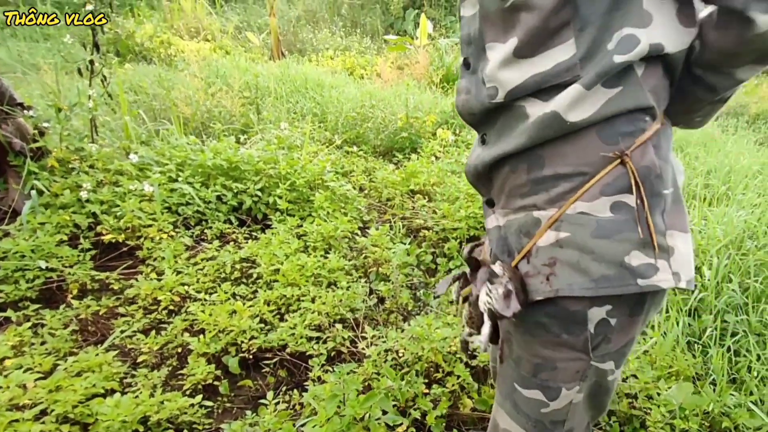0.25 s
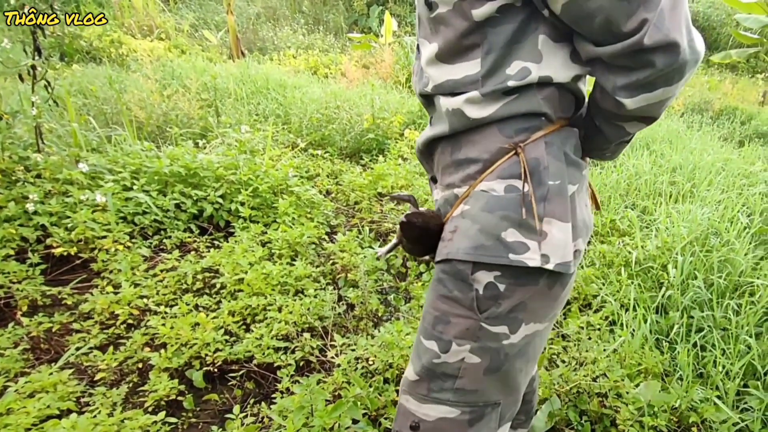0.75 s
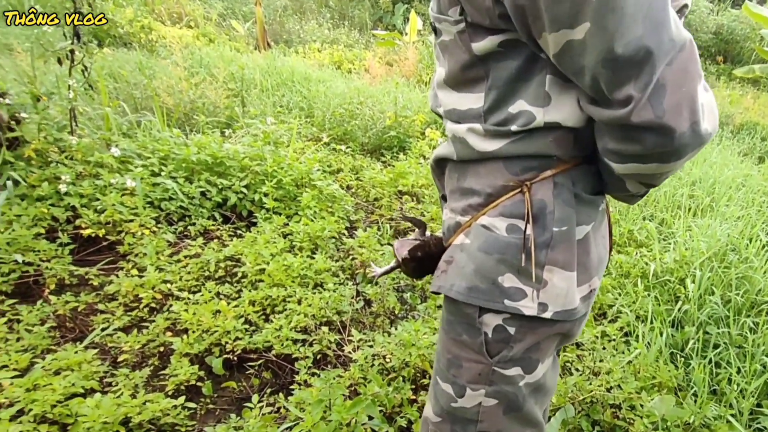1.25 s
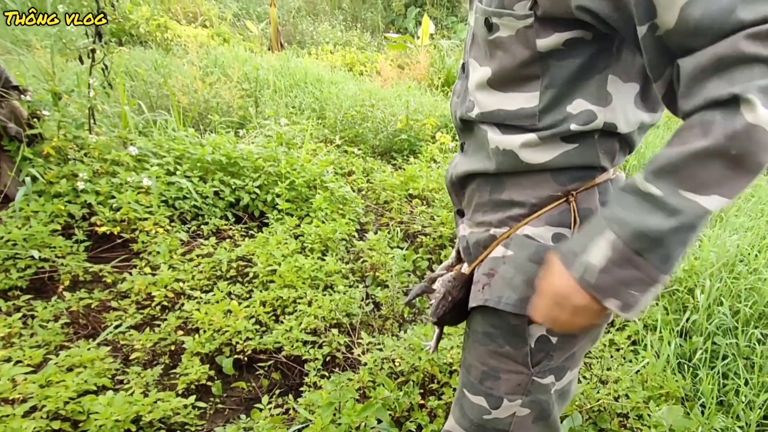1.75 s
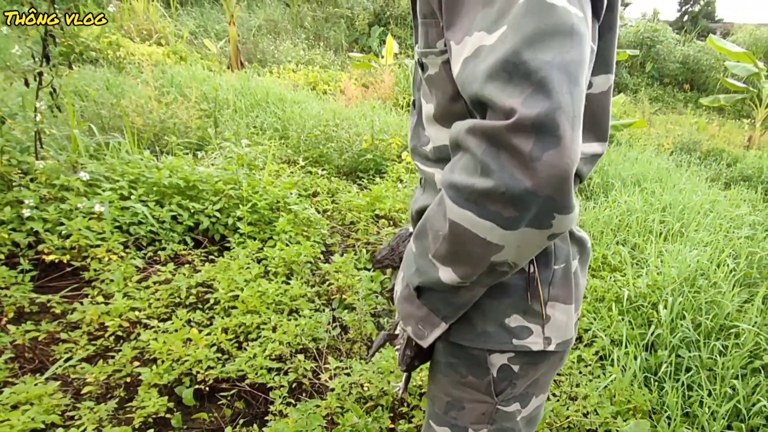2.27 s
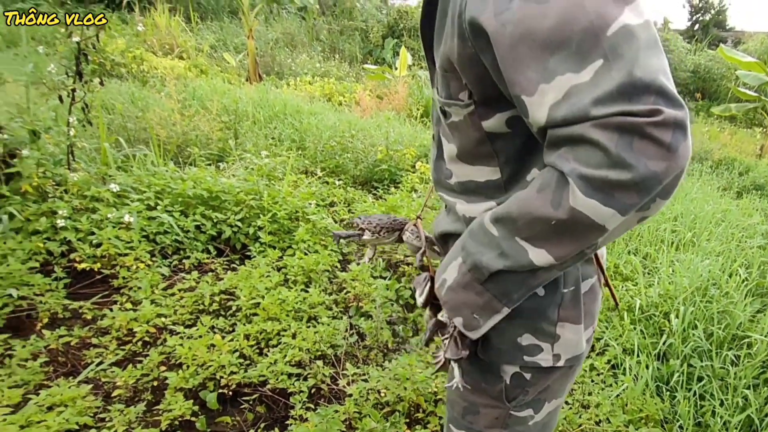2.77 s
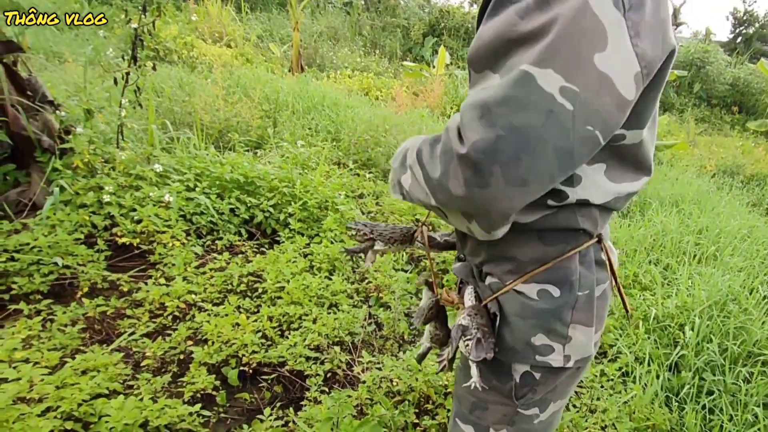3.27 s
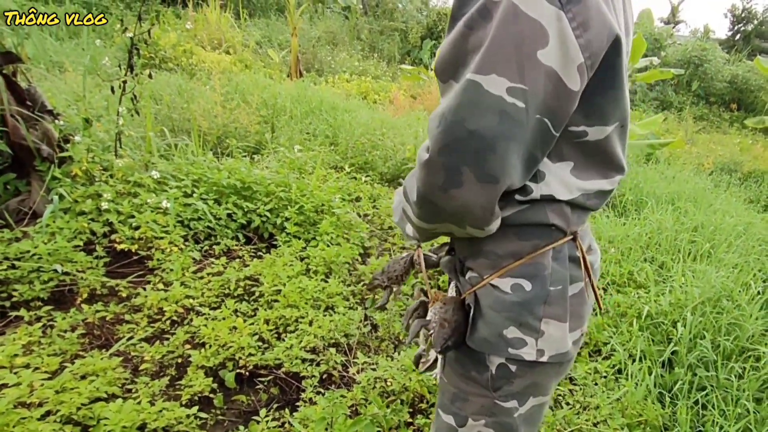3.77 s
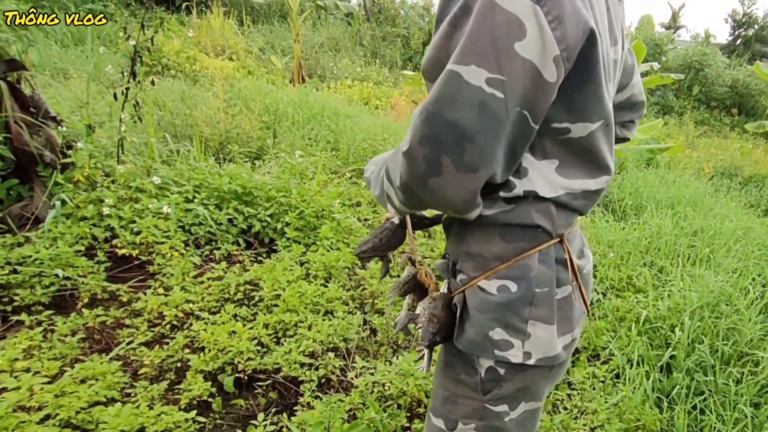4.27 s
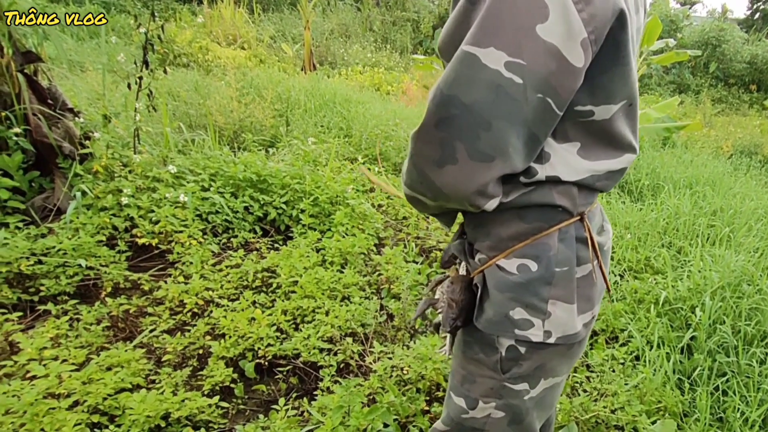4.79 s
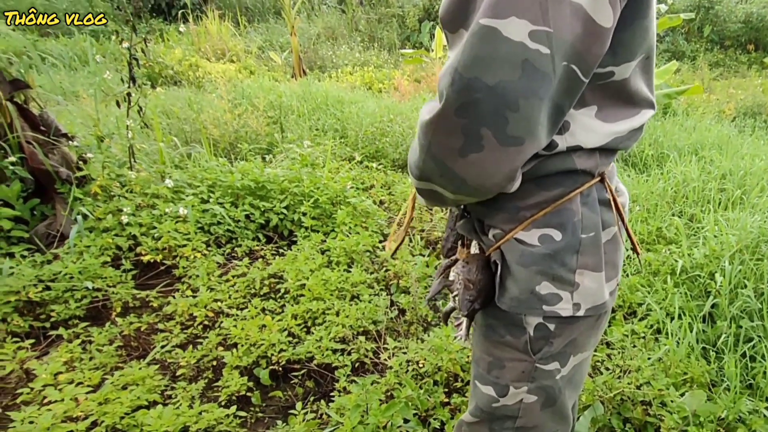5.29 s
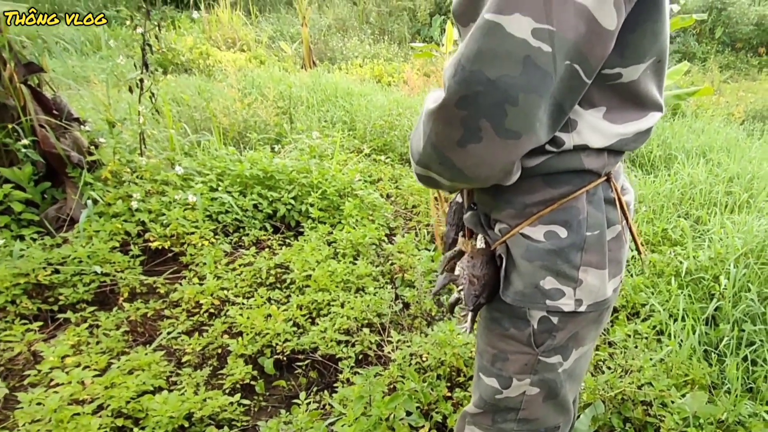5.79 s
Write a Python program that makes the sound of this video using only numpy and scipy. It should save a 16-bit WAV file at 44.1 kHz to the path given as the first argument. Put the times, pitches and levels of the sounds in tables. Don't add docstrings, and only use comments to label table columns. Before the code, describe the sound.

Three loud, buzzy, wailing frog distress cries outdoors, each ending in a small gulp, among cloth rustle, tiny ticks, faint hum and a far bark.

```python
import sys
import numpy as np
from scipy import signal
from scipy.fft import rfft, irfft
from scipy.io import wavfile
from scipy.ndimage import uniform_filter1d, map_coordinates

SR = 44100
rng = np.random.default_rng(int(sys.argv[2]) if len(sys.argv) > 2 else 0)


def int16_out(signal):
    q = np.round(np.clip(np.atleast_2d(signal).T, -1, 1) * 32767)
    wavfile.write(sys.argv[1], SR, q.astype(np.int16))


def volts(x):
    e = np.asarray(x, float) / 20
    return 10 ** e


N = 266364
FFT_SIZE = 1024


def along(points, hz):
    f, v = np.transpose(points)
    return np.interp(np.log(hz + 1), np.log(f + 1), v)


def curves(rows, t):
    s, *cols = np.transpose(rows)
    return [np.interp(t, s, c) for c in cols]


def unit(x):
    return x / np.sqrt(np.mean(np.abs(x) ** 2, axis=-1, keepdims=True) + 1e-20)


def wobble(rate_hz):
    knots = rng.standard_normal(int(N * rate_hz / SR) + 4)
    return map_coordinates(knots, [np.arange(N) * rate_hz / SR])


def outdoors(x, t60_s, dull_hz):
    t = np.arange(SR // 2) / SR
    tail = rng.standard_normal((2, len(t))) * volts(-60 * t / t60_s) * np.clip(t / 0.0022, 0, 1)
    tail = signal.lfilter(*signal.butter(1, dull_hz, fs=SR), tail)
    return signal.fftconvolve(np.atleast_2d(x), tail / np.linalg.norm(tail[0]), axes=1)[:, :N]


# freq_hz, correlation
LIKENESS = [(60, 0.86), (150, 0.9), (380, 0.73), (950, -0.125), (2380, -0.039), (5980, 0.024),
            (15000, -0.13)]


def rush(spectrum, patchy_db):
    _, _, z = signal.stft(rng.standard_normal((2, N + FFT_SIZE)), SR, nperseg=FFT_SIZE)
    patches = uniform_filter1d(uniform_filter1d(rng.standard_normal(z.shape[1:]), 8, 0), 5, 1)
    z = z * volts(patchy_db * patches / patches.std())
    pair = signal.istft(z, SR, nperseg=FFT_SIZE)[1][:, :N]
    f = np.fft.rfftfreq(N, 1 / SR)
    turn = np.arccos(np.clip(along(LIKENESS, f), -1, 1)) / 2
    mid, side = irfft(rfft(pair) * volts(along(spectrum, f)) * [np.cos(turn), np.sin(turn)], N)
    return unit(np.array([mid + side, mid - side]))


# start_s, end_s, pitch_rise_s, pitch_collapse_s, duck_db
SCREAM_TIMES = [
    (0.044, 0.574, 0.022, 0.052, 12),
    (1.112, 1.555, .031, 0.061, 7),
    (2.802, 3.483, .02, .075, 9.5),
]


def ducking(t):
    quick_share, quick_s, slow_s = 0.29, 0.1, 0.71
    dips = []
    for start, end, _, _, depth_db in SCREAM_TIMES:
        after = np.maximum(t - end, 0)
        down = 1 - np.exp(-np.maximum(t - start - 0.03, 0) / 0.08)
        back = quick_share * np.exp(-after / quick_s) + (1 - quick_share) * np.exp(-after / slow_s)
        dips.append(depth_db * down * back)
    return np.max(dips, axis=0)


# freq_hz, level_db
ENGINE_SPECTRUM = [(13, -40), (22, -13), (59, -5.5), (102, -10), (175, 2.5), (193, -2), (241, -9),
                   (422, -10.5), (480, -12), (619, -11), (715, -17.5), (800, -12.5), (1000, -21),
                   (1300, -66), (2200, -120)]


def engine(duck_db):
    level_db = -49 - 1.15 * duck_db + 0.556 * wobble(27)
    return volts(level_db) * rush(ENGINE_SPECTRUM, patchy_db=2.0)


# freq_hz, level_db
LEAF_SPECTRUM = [(410, -37.5), (700, -7.5), (784, 1.5), (878, -11), (1060, 1), (1520, -5), (1900, -2.5),
                 (4070, -4.5), (4850, -8.5), (7030, -12.5), (8200, -32.5), (10700, -62.5), (18000, -120)]


def leaves(duck_db, brush_db):
    level_db = -52.5 - duck_db + 0.58 * brush_db + 0.56 * wobble(9)
    return volts(level_db) * rush(LEAF_SPECTRUM, patchy_db=2.06)


# freq_hz, level_db
CLOTH_SPECTRUM = [(3820, -26), (6500, -5.5), (8460, -13.5), (11000, -13), (14000, -17.5), (16000, -19.5)]


def cloth(duck_db, brush_db):
    grains = volts(2.5 * wobble(280) + 1.2 * wobble(30))
    level_db = -70 - 0.64 * duck_db + 0.57 * brush_db
    return volts(level_db) * unit(grains * rush(CLOTH_SPECTRUM, patchy_db=-0.5))


# time_s, length_s, swell_db
CLOTH_BRUSHES = [
    (.01, 0.055, 3.5),
    (0.931, 0.18, 15),
    (2.1, 0.097, 2),
    (2.775, 0.31, 6),
    (5.102, 0.31, 2),
]


def field():
    t = np.arange(N) / SR
    duck_db = ducking(t)
    brush_db = sum(db * np.exp(-((t - s) / length) ** 2) for s, length, db in CLOTH_BRUSHES)
    return engine(duck_db) + leaves(duck_db, brush_db) + cloth(duck_db, brush_db)


def ticks(rows, turns, hiss):
    out, t = np.zeros((2, N)), np.arange(SR // 50) / SR
    for s, db, hz, pan_db in rows:
        wave = np.sin(2 * np.pi * hz * t) + hiss * rng.standard_normal(len(t))
        wave *= np.exp(-t * hz / turns) * (1 - np.exp(-t * hz * 3))
        pan = volts([[pan_db / 2], [-pan_db / 2]])
        out[:, round(s * SR):][:, :len(t)] += volts(db + 6.5) * wave * pan
    return out


# time_s, peak_db, pitch_hz, left_right_db
DULL_TICKS = [
    (0.033, -34, 853, 0),
    (1.093, -34, 756, 3.5),
    (2.792, -24.5, 1080, 2),
    (4.435, -33, 1440, 5),
]
# time_s, peak_db, pitch_hz, left_right_db
BRIGHT_TICKS = [(0.6614, -57.5, 3780, -12), (0.7154, -61, 2720, -5), (0.9991, -42.5, 3800, -9),
                (1.057, -42, 5150, -3.5), (1.0919, -41, 5800, 10), (1.9155, -54, 3860, 4),
                (2.0428, -42, 3860, 0), (2.0944, -48, 4020, 8), (2.173, -58, 2650, 0.0),
                (2.384, -44, 4100, 7.5), (2.4508, -43.5, 3670, -2), (2.6683, -37, 3970, 5),
                (4.5431, -37.5, 3636, 3.5), (4.6374, -47, 3630, 5), (5.1262, -51, 2660, -8),
                (5.253, -42.5, 4450, -5), (5.4194, -55, 3140, -3)]


def contacts():
    return ticks(DULL_TICKS, turns=1.27, hiss=0.021) + ticks(BRIGHT_TICKS, turns=1.74, hiss=.08)


# start_s, level_db, pitch_hz, length_s
DOG_BARKS = [
    (3.058, -44.5, 562, 0.053),
    (4.843, -29.5, 570.3, 0.0653),
]
# multiple, level_db
DOG_PARTIALS = [(1, -10), (2, 0), (3, -17), (4, -32)]
# delay_s, level_db
TREE_ECHOES = [(0.041, -15), (0.071, -6), (.105, -20), (0.151, -19)]


def dog():
    out = np.zeros(N + SR)
    for s, db, hz, length in DOG_BARKS:
        u = np.linspace(0, 1, round(length * SR))
        for delay, echo_db in [(0.002, 0.0066)] + TREE_ECHOES:
            pitch_hz = hz * (1 - 0.147 * (1 - u) ** 2) * (1 + 0.0326 * rng.standard_normal())
            turn = 2 * np.pi * np.cumsum(pitch_hz) / SR
            turn += .35 * map_coordinates(rng.standard_normal(16), [u * length * 160])
            hoarse = volts(4.1 * map_coordinates(rng.standard_normal(16), [u * length * 130]))
            tone = sum(volts(p + rng.normal(0, 0.73)) * np.sin(k * turn) for k, p in DOG_PARTIALS)
            bark = volts(db + echo_db) * tone * hoarse * np.sin(np.pi * u ** 1.96)
            out[round((s + delay) * SR):][:len(u)] += bark
    out = out[:N]
    direct = np.array([volts(0.5) * out, volts(-3.0) * np.roll(out, 10)])
    return direct + volts(-13.5) * outdoors(out, t60_s=0.33, dull_hz=3000)


# start_s, length_s, level_db, pitch_hz, sag_hz_per_s
FROG_GULPS = [
    (0.675, 0.081, -45.5, 489, 1986),
    (1.566, 0.03, -44.5, 443, 30.2),
    (1.666, 0.075, -43.5, 453, 1500),
    (3.485, 0.064, -52.5, 470, 100),
    (3.605, 0.075, -51, 548, 1620),
]


def gulps():
    out = np.zeros(N)
    attack_s, release_s = 0.004, 0.031
    for s, length, db, hz, sag in FROG_GULPS:
        t = np.arange(round(length * SR)) / SR
        turn = 2 * np.pi * np.cumsum(hz - sag * t) / SR
        shape = np.clip(np.minimum(t / attack_s, (length - t) / release_s), 0, 1) ** 2
        second = volts(-26 + 30.5 * t / length)
        tone = np.sin(turn) + second * np.sin(2 * turn)
        out[round(s * SR):][:len(t)] += np.sqrt(2) * volts(db) * shape * tone
    return out


def throat_pulses(call, pitch):
    start, end, rise, collapse, _ = call
    t = np.arange(round(start * SR), round(end * SR)) / SR
    glide_hz = uniform_filter1d(curves(pitch, t)[0], size=400, mode="nearest")
    glide_hz = glide_hz * (1 - .59 * np.exp(-((t - start) / rise) ** 2))
    glide_hz = glide_hz * (1 - 0.65 * np.exp(-((end - t) / collapse) ** 2))
    cycles = np.cumsum(glide_hz) / SR
    s = np.interp(np.arange(int(cycles[-1]) + 1), cycles, t)
    rate_hz = np.interp(s, t, glide_hz)
    luck = rng.standard_normal((len(s), 3))
    slack = (480 / rate_hz) ** 2.5
    s = s + .0007 * slack * luck[:, 0] / rate_hz
    return s, rate_hz, luck, slack


def bell(f, hz, width):
    return f * width / np.hypot(hz * hz - f * f, f * width)


def cavities(f, modes, steep):
    return unit(np.sqrt(sum((volts(db) * bell(f, hz, w) ** steep) ** 2 for hz, w, db in modes)))


# freq_hz, width_hz, level_db
UPPER_CAVITY = [(6800, 900, 0)]
FIZZ_CAVITIES = [(10010, 610, -3.5), (10890, 395, -1), (12630, 540, -11), (14200, 1300, -10.5)]
BELLY_CAVITY = [(520, 330, 0)]


def mouth_power(f, hz, closing, upper_db, side_db, leak_db, fizz_db, belly_db):
    gaping = np.clip((hz - 2300) / 900, 0, 1)
    low = bell(f, hz * (1 - .1 * gaping), 420 + 250 * gaping + 450 * closing)
    high = bell(f, hz * (1 + .12 * gaping), 450 + 350 * gaping + 450 * closing)
    shift = f * 6800 / (4950 + 0.62 * hz)
    mouth = low * high * (f / hz) ** 0.362 + .1 * gaping * bell(f, hz * 0.5, 1300) ** 1.7
    power = unit(mouth) ** 2
    power += (volts(upper_db) * cavities(shift, UPPER_CAVITY, steep=2.2)) ** 2
    power += (volts(fizz_db) * cavities((f + shift) / 2, FIZZ_CAVITIES, steep=0.89)) ** 2
    power *= 1 - .9 * gaping * bell(f, 1300, 900) ** 2
    power += (volts(belly_db) * cavities(f, BELLY_CAVITY, steep=1)) ** 2
    power += (volts(side_db) * (.2 + gaping) * bell(shift, 5200, 1100) ** 1.2) ** 2
    power += (volts(leak_db) * (1 - gaping) * bell(f, 3100, 2500)) ** 2
    power *= volts(.5 * (fizz_db + 20.5) * np.clip(f / 12000 - .9, 0, 1) * 6.2)
    power += (volts(belly_db + 20.5 - 9 * gaping) * bell(f, 1000, 602.8) ** 1.28) ** 2
    return power


def ringing(power, onset):
    cep = irfft(np.log(power + 1e-9) / 2, FFT_SIZE)
    cep[:, 1:FFT_SIZE // 2] *= 2 - onset
    cep[:, FFT_SIZE // 2 + 1:] *= onset
    return -np.exp(rfft(cep))


# time_s, right_lag_us, left_right_db
SWING = [(0.11, 25, 0), (0.195, 7.1, 0), (0.32, 46.6, 0.9), (0.525, 79, 0), (1.15, 153, 0), (1.25, 152, 1),
         (1.4, 144, 0.5), (1.52, 144, 0.8), (2.845, 116, -2), (2.92, 94, -2.5), (3.1, 76, 2),
         (3.22, 66.5, -1.3), (3.44, 70, 1.3)]


def at_microphones(pulse, s, f):
    lag_us, pan_db = curves(SWING, s)
    out = np.zeros((2, N))
    for ear, sign in enumerate((-1, 1)):
        at = (s + sign * lag_us / 2e6) * SR
        first = np.floor(at).astype(int) - 160
        near_s = 0.00061 + .0001 * wobble(4.6)[first, None]
        back_s = 0.001295 + .00012 * wobble(7)[first, None]
        copies = 0.139 * np.exp(-2j * np.pi * f * near_s) + 0.39 * np.exp(-2j * np.pi * f * back_s)
        heard = pulse * (1 + copies * f / (f + 3000)) * volts(-sign * pan_db / 2)[:, None]
        wave = irfft(heard * np.exp(-2j * np.pi * f / SR * (at - first)[:, None]), FFT_SIZE)
        out[ear] = np.bincount((first[:, None] + np.arange(FFT_SIZE)).ravel(), wave.ravel(), N)[:N]
    return out


# time_s, length_s, edge_scatter_cycles
VOICE_CRACKS = [(.07, .028, .03), (.235, .01, .005), (.39, .012, .005), (.51, .03, .009),
                (1.14, .028, .035), (1.33, .015, .005), (1.46, .055, .022), (2.82, .02, .04),
                (3.14, .014, .06), (3.38, .06, .011)]


def scream(call, pitch, mouth, colour, fullness):
    start, end = call[:2]
    s, rate_hz, luck, slack = throat_pulses(call, pitch)
    sample = (s * SR).astype(int)
    db, jaw_hz = [c[:, None] for c in curves(mouth, s)]
    since, left = np.abs(s - start)[:, None], np.abs(end - s)[:, None]
    db = db - 14.5 * np.exp(-since / .008) - 27 * np.exp(-left / 0.017)
    closing = np.exp(-(left / 0.033) ** 1.4)
    hz = jaw_hz * (1 - .62 * closing)
    shut = np.clip((2400 - jaw_hz) / (2400 - 1070), 0, 1)
    cracked = sum(depth * np.exp(-((s - at) / length) ** 2) for at, length, depth in VOICE_CRACKS)

    upper_db = colour[0] + 10.5 * shut
    side_db = colour[1] + 10.5 * shut
    leak_db = upper_db + 8.5
    upper_db = upper_db + 15 * np.minimum(cracked[:, None] / 0.065, 1) ** 2 * (1 - shut)
    fizz_db = colour[2] + colour[3] * since - 13 * shut - 10 * closing
    belly_db = fullness[0] + fullness[1] * since - 9 * (jaw_hz - 3200) / 1000
    belly_db = belly_db + 11 * np.exp(-left / 0.067)
    hz = hz * (1 + 2.2 * np.minimum(cracked, .025) * wobble(70)[sample])[:, None]

    f = np.fft.rfftfreq(FFT_SIZE, 1 / SR)
    power = mouth_power(f, hz, closing, upper_db, side_db, leak_db, fizz_db, belly_db)
    db = db + 0.75 * wobble(28.13)[sample, None]
    shimmer_db = .1 * slack[:, None] * luck[:, 1:2]
    pulse = ringing(power, onset=0.281) * volts(db + shimmer_db) * np.sqrt(SR / rate_hz)[:, None]
    crack_s = (cracked * luck[:, 2] / rate_hz)[:, None]
    edge_hz = 10.8 * np.maximum(rate_hz, 380)[:, None]
    pulse *= np.exp(-2j * np.pi * f * crack_s * f ** 8 / (f ** 8 + edge_hz ** 8))
    pulse *= f ** 4 / (f ** 4 + 300. ** 4)
    return at_microphones(pulse, s, f)


# time_s, pitch_hz
HELD_PITCH = [
    [(.096, 517.8), (.16, 548.3), (.238, 543), (.252, 528.2), (.273, 529.4), (.317, 502.3), (.363, 500.2),
     (.411, 453.1), (.469, 444.6)],
    [(1.184, 513.3), (1.204, 517.6), (1.262, 508.1), (1.29, 497.7), (1.316, 498.2), (1.35, 479),
     (1.415, 407), (1.45, 394), (1.5, 404)],
    [(2.89, 520.1), (2.923, 497.2), (2.965, 499.2), (3.032, 478.4), (3.12, 474.8), (3.154, 498.5),
     (3.198, 494), (3.224, 507.8), (3.36, 469.4)],
]
# time_s, level_db, mouth_hz
JAW = [
    [(.055, -35.5, 990), (.11, -31, 1030), (.14, -20.5, 1150), (.172, -8.5, 2290), (.195, -11, 3030),
     (.22, -14.5, 3280), (.32, -19.5, 3300), (.44, -20, 3070), (.53, -21.5, 2850)],
    [(1.112, -26, 1310), (1.135, -15, 2080), (1.15, -9, 3070), (1.2, -10.5, 3220), (1.25, -11, 3340),
     (1.3, -14, 3200), (1.4, -14, 3000), (1.49, -18.5, 2860), (1.54, -17.5, 2930)],
    [(2.803, -21, 1200), (2.82, -31, 1290), (2.833, -16.5, 1630), (2.845, -9, 2290), (2.86, -9.5, 3100),
     (2.98, -13, 3267), (3.1, -15, 3270), (3.26, -14.5, 3060), (3.44, -21.5, 2925)],
]
# upper_db, side_db, fizz_db, fizz_drift_db_per_s
BRIGHTNESS = [(-15.5, -5, -27, 13), (-18, -3, -19.5, -10.5), (-18, -12, -21.5, -23)]
# level_db, drift_db_per_s
BELLY_SHARE = [(-24.5, -19.5), (-32.5, 20), (-28.5, 6)]


def frog():
    calls = zip(SCREAM_TIMES, HELD_PITCH, JAW, BRIGHTNESS, BELLY_SHARE)
    voice = volts(-3.0) * sum(scream(*rows) for rows in calls) + gulps()
    close = volts(-12) * outdoors(voice, t60_s=0.016, dull_hz=8850)
    far = volts(-35) * outdoors(voice, t60_s=.3, dull_hz=3000)
    return voice + close + far


def scene():
    return field() + contacts() + dog() + frog()


def top_cut(x):
    return signal.sosfilt(signal.butter(12, 16650, fs=SR, output="sos"), x)


def record(dry):
    ceiling, knee = .86, 6
    rounded = dry / (1 + np.abs(dry / ceiling) ** knee) ** (1 / knee)
    kept = np.fft.rfftfreq(N, 1 / SR) < 15850
    mix = irfft(rfft(rounded) * kept, N)
    return top_cut(mix)


dry = scene()
out = record(dry)
int16_out(out)
```